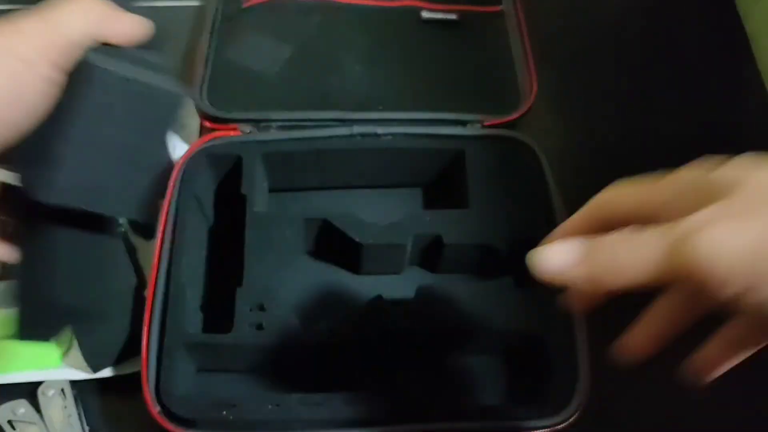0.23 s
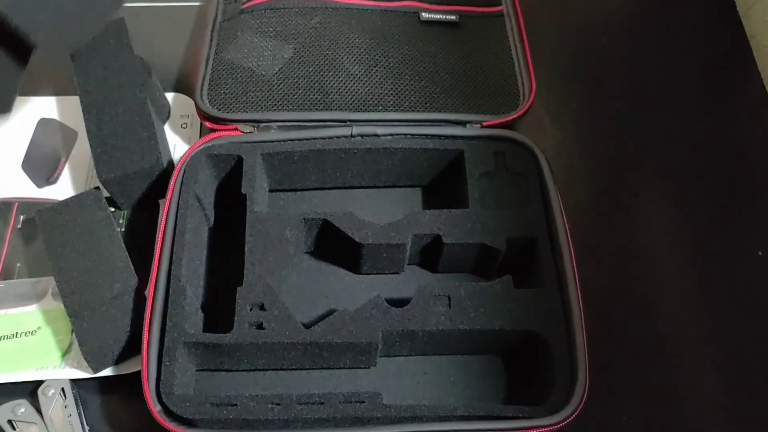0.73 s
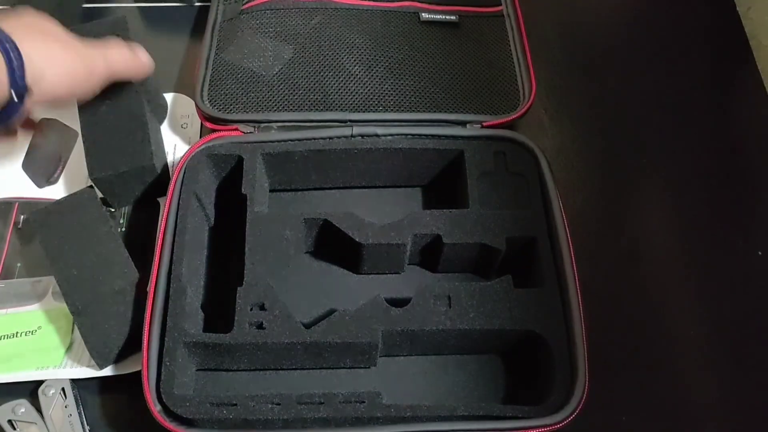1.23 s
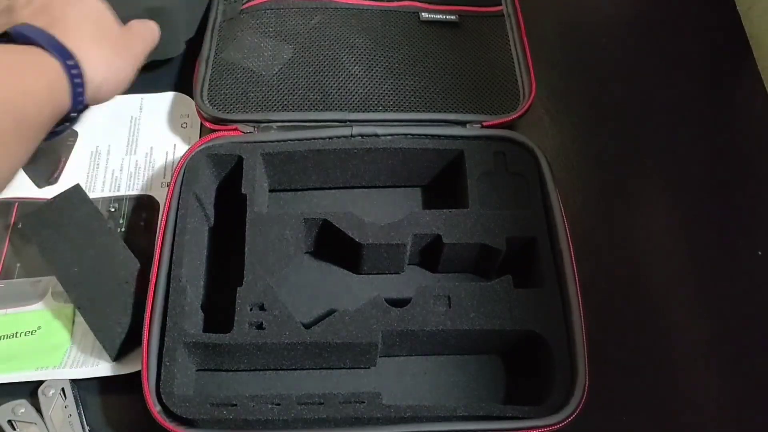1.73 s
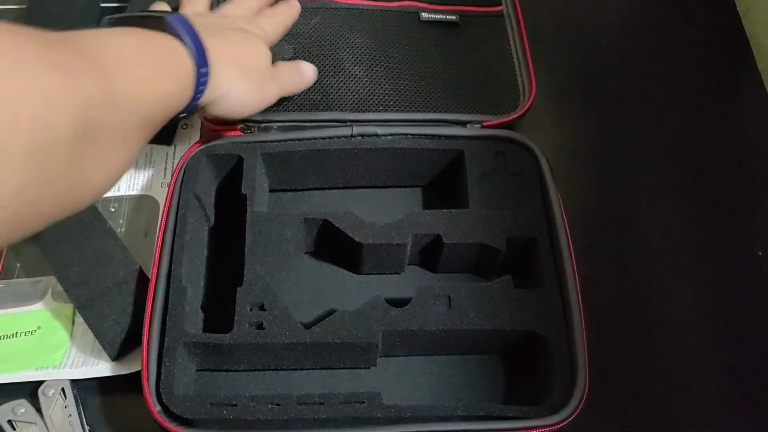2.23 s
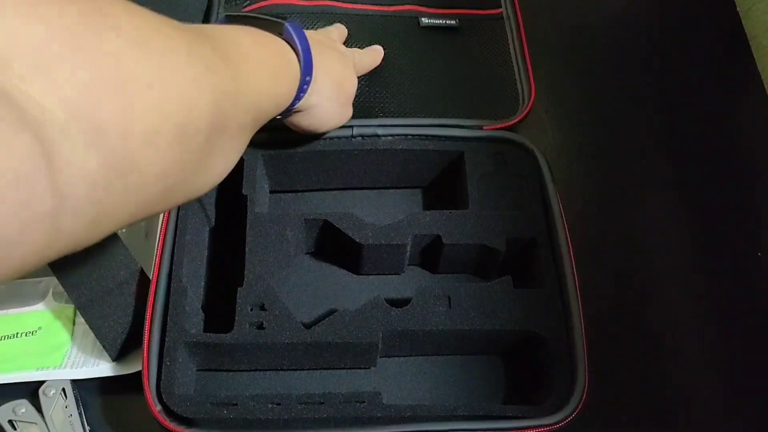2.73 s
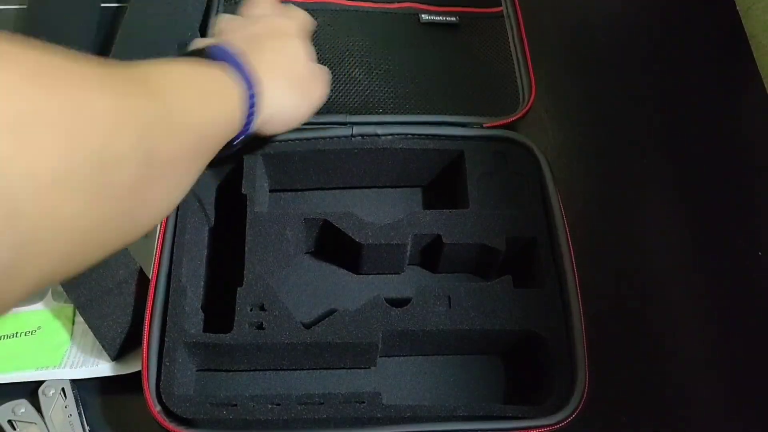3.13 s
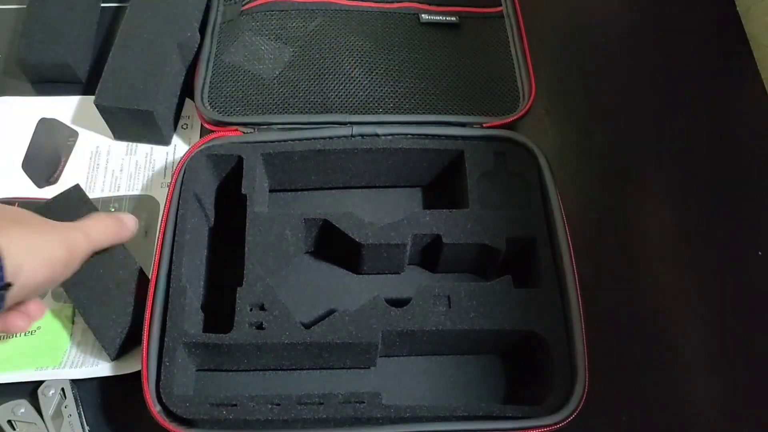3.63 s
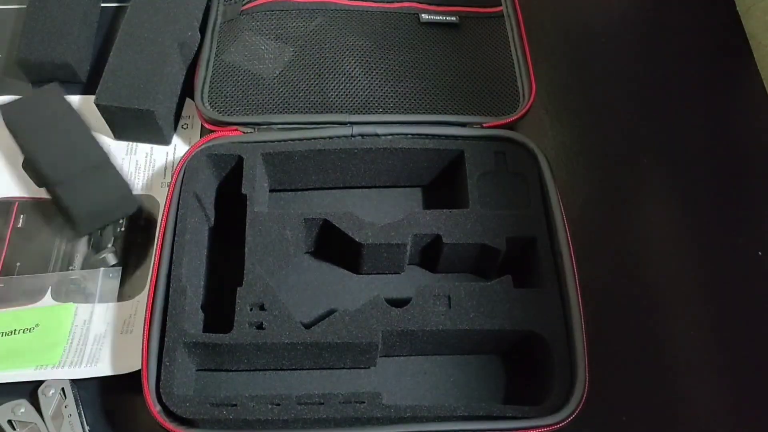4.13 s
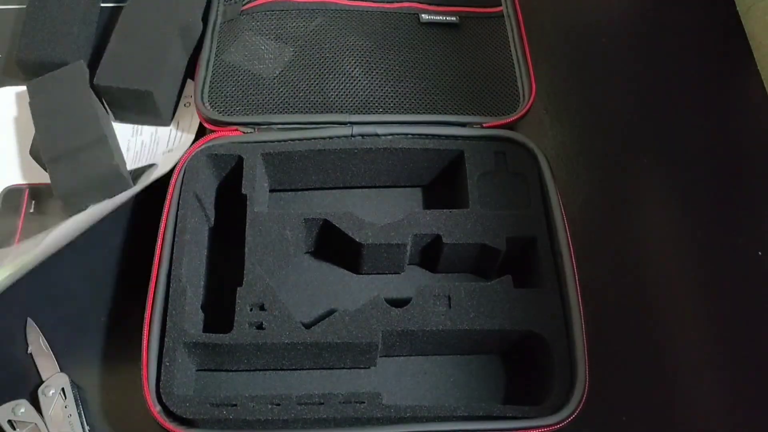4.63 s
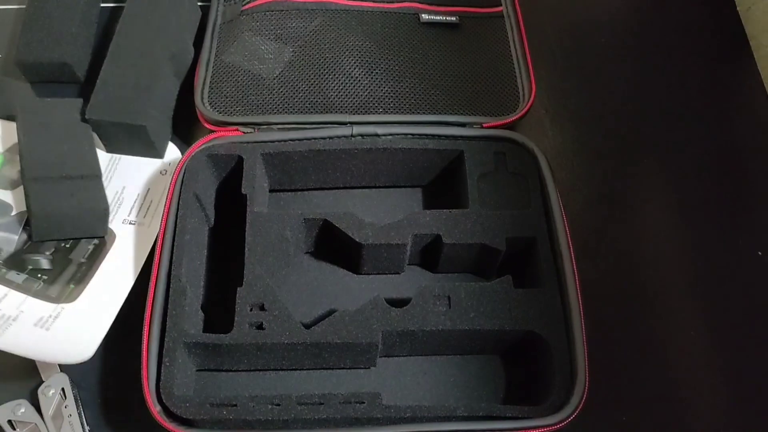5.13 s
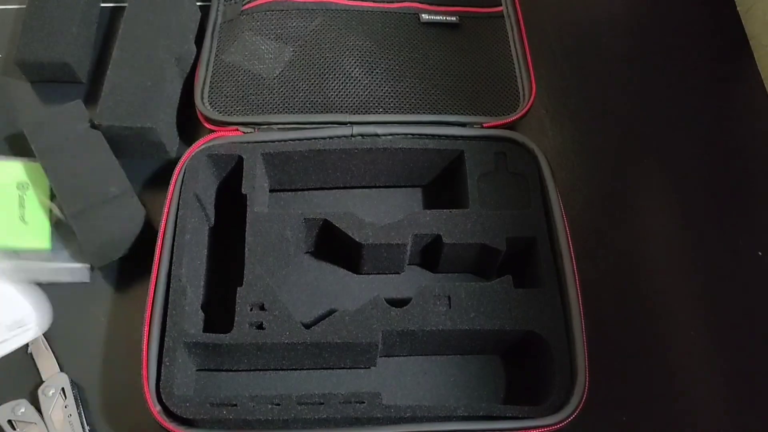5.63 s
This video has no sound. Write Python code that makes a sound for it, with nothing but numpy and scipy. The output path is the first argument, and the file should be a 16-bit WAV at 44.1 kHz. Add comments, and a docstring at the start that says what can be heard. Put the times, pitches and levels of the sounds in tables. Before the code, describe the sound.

A smooth low hum runs throughout in a small quiet room, with one microphone close to a table. A faint hissy rub of stiff foam on paper comes first. At about 0.8 seconds foam blocks land with soft knocks, each bouncing once and ringing the hollow tabletop. A louder cluster follows from 1.2 to 1.4 seconds, mixed with rasps and tiny snaps. A short slide comes at 2 seconds, a firm knock at 2.2, light rubs around 2.5 and 3, and another knock at 3.3. After a lull, a gentle bump sounds at 4.4 seconds. From 4.6 until nearly 6 seconds, foam and paper slide in a grainy, scraping rub with small snaps and a few weak bumps at its start. Faint, brief fuzzy tones flicker over the hum behind the handling.

```python
"""A smooth low hum and a faint rub of foam on paper come first, on one microphone.
Close by, in a small quiet room, stiff foam blocks are set down and slid on papers beside an open hard case.
Each landing is a soft blow that bounces once and rings the hollow table; tiny slips of the foam cells
make rubs and snaps. Behind them, faint narrow tones flicker over the hum."""
import sys
import numpy as np
from scipy import signal
from scipy.fft import rfft, irfft
from scipy.io import wavfile
from scipy.ndimage import uniform_filter1d, minimum_filter1d

SR = 44100
rng = np.random.default_rng(int(sys.argv[2]) if len(sys.argv) > 2 else 0)


def master(y):
    """Save y as 16-bit WAV."""
    cut = np.clip(np.atleast_2d(y).T, -1, 1)
    pcm = np.round(cut * 32767)  # scale
    wavfile.write(sys.argv[1], SR, pcm.astype(np.int16))


N = 259456

# spectrum of the background hum: (frequency [Hz], relative density [dB])
HUM_SPECTRUM = [(12, -35.5), (20, 1), (304, 3.5), (490, -4), (630, 0.5), (1040, -6.5), (1730, -9.5),
                (1860, -10), (2220, -14.5), (6550, -30), (8220, -34), (10700, -66), (18100, -120)]
# the clearest narrow tones: (start [s], frequency [Hz], level [dB], length [s])
FLICKER_TONES = [(0.682, 1744, -57, 0.039), (1.56, 5960, -64, 0.2), (1.688, 1820, -58, .11),
                 (2.015, 1357, -40, 0.057), (2.527, 3124, -57.5, 0.14), (2.554, 620, -54, 0.052),
                 (2.941, 1870, -61, 0.07), (3.056, 1700, -61.5, 0.14), (3.167, 642, -56, 0.25),
                 (3.543, 1873, -58.5, 0.29), (3.402, 1675, -65.5, .14), (3.776, 1462, -62.5, 0.19),
                 (3.886, 1838, -61.5, 0.088), (4.065, 1877, -65.5, 0.16), (4.733, 1640, -39.5, 0.038),
                 (5.21, 2500, -51, 0.058), (5.215, 1605, -54.5, 0.082), (5.327, 1515, -43.5, 0.029),
                 (5.659, 2180, -56, .075)]
# reverberation of the small room: (frequency [Hz], t60 [s])
ROOM_DECAY = [(100, 0.46), (300, 0.27), (700, 0.32), (2000, 0.29), (5000, 0.25), (8000, 0.16)]
# spectra of the foam's hiss and rasp: (frequency [Hz], relative density [dB])
HISS_SPECTRUM = [(2350, -49), (4000, -7.5), (4460, -11), (4920, 1.5), (5290, 2.5), (6600, 9.5),
                 (7790, -1.5), (8350, -27.5), (10700, -56.5), (18100, -120)]
RASP_SPECTRUM = [(1800, -53), (2500, 16.5), (3500, 9), (4600, 11), (5500, -37)]
# boxy resonances of foam on paper: (frequency [Hz], nominal width [Hz], relative level [dB])
BODY_MODES = [(1404, 83, 4.5), (1623, 180, 7), (1860, 150, -2), (2242, 190, -2), (1264, 120, -3)]
# slides across the paper: (start [s], rise [s], hold [s], hiss level [dB], change over the hold [dB],
# rasp re hiss [dB], body re hiss [dB], rasp centre [Hz])
RUB_STROKES = [(-.02, .02, 0.13, -67, -9.5, -30, -20, 2530), (0.301, .17, 0.18, -51.5, 2, -17, -19, 3900),
               (1.184, 0.033, 0.042, -42, -1.5, 2, 1.5, 3200),
               (1.48, 0.017, 0.016, -62.5, -6.5, -7.5, 4, 2840),
               (1.562, 0.12, .14, -69, -11, -28.5, 5.5, 2600),
               (1.784, 0.11, .11, -60.5, -4.5, -7.5, -0.5, 3400),
               (1.975, 0.07, 0.15, -46, -23.5, 0.5, 3.5, 3450),
               (2.524, 0.031, 0.18, -48, -8.5, -11.5, -13.5, 3100),
               (2.94, .025, 0.087, -59.5, 1.5, -15, -25, 3400),
               (3.06, .035, 0.034, -50.5, -11.5, -17, -5, 2450),
               (3.5, 0.029, 0.083, -71.5, -4.5, -25, -25, 3000),
               (4.614, 0.021, .23, -44.5, -10.5, -2, -7, 3720), (4.841, .04, .07, -56, -3, -19, -3.5, 3846),
               (4.712, 0.063, 0.061, -53, -3.5, -14, 11, 3670),
               (4.957, .025, .03, -58.5, -0.5, 3, -2, 2500), (5.005, .02, 0.08, -44, -5.5, 1.5, 12.5, 2750),
               (5.1, 0.032, .32, -49.5, -0.5, -2, -4.5, 2950), (5.455, .06, 0.16, -48, -2, -5, -10.5, 3900),
               (5.687, .03, 0.3, -56, -11.5, -18.5, -22.5, 2600),
               (5.806, 0.097, .05, -49, -6, -3, 1.5, 2745)]
# snaps of foam and paper: (time [s], hiss level [dB], rasp re hiss [dB], body re hiss [dB], length [s])
FOAM_SNAPS = [(0.79, -60.5, 13, 15.5, .016), (0.903, -33, 1, 8, 0.0079), (1.032, -45.5, 8.5, 16, 0.0058),
              (1.218, -38, -0.5, 5.5, 0.029), (1.302, -44, -12, 9, 0.011), (1.374, -32.5, 10, 19.5, 0.0041),
              (1.395, -42.5, -22.5, -2.5, 0.0087), (2.225, -38, 3, 0.5, 0.0091),
              (2.528, -48, -1, -8, 0.012), (2.808, -54.5, -8.5, -1, 0.012),
              (2.954, -51.5, -4.5, -9.5, 0.012), (3.065, -43, -28.5, -29, 0.0059),
              (4.611, -54.5, 5.5, -10, .01), (4.753, -36.5, -2.5, 3.5, 0.016), (4.977, -39.5, 1.5, -8, .01),
              (5.015, -36.5, 1.5, 4, 0.019), (5.124, -47, 15, 10.5, 0.0053),
              (5.417, -35, -9.5, -29, 0.0076), (5.856, -49, 6, 9, 0.016)]
# modes of the hollow table top: (frequency [Hz], relative level [dB], t60 [s])
TABLE_MODES = [(78.8, -11.5, 0.23), (97, -8.5, 0.44), (150, -33.5, .3), (226.8, -1.5, .25), (237, -24, .2),
               (307.2, -1, 0.22), (360.4, 4, 0.16), (409.5, -3, 0.21), (480, 5.5, 0.034),
               (516, -19.5, 0.083), (642, -11.5, 0.1), (742.6, -14.5, 0.16), (723, -22.5, 0.063),
               (790, -18, .2), (876, -22, 0.12)]
# blocks landing on the table: (time [s], level [dB], pitch [Hz], contact [cycles],
# hard edge re blow [dB], bounce re blow [dB])
BLOWS = [(0.202, -45, 334, 4.5, -21.5, -9), (.784, -11.5, 211, 2.17, -31, -19.5),
         (.792, -6.5, 302, 2.38, -11.5, -5.5), (0.877, -11, 416, 2.78, -16.5, -16.5),
         (1.185, -14, 418, 3.05, -18, -24), (1.21, -15, 349, 4.5, -17, 6),
         (1.241, 2.5, 408, 2.1, -15.5, -20), (1.249, -11, 298.5, 6, -25, -8.5),
         (1.374, 4, 427, 2.38, -10.5, -28.5), (1.38, -3.5, 408.6, 2.06, -11.5, -6),
         (1.415, -25, 330, 2.3, 10, -1), (1.495, -19.5, 250, 1.92, -10, -11),
         (1.823, -38.5, 295, 3.8, -14, -15.5), (1.993, -27.5, 401, 4.5, -28, -1.5),
         (2.049, -35.5, 296.6, 3.5, -25.5, -22.5), (2.228, -1, 372.5, 2.77, -10.5, -10),
         (3.302, -7.5, 391, 2.83, -14, -9), (4.33, -43, 190, 3.1, -24, -5.5),
         (4.412, -23.5, 329, 3.34, -35, 7), (4.705, -31.5, 369.5, 4.4, 5.5, -3),
         (4.74, -36.5, 360, 5.7, -16.5, -6.5), (4.772, -29, 396.5, 4.4, -11, -16)]

HUM_DB = -60
FAINT_FROM_S, FAINT_TO_S, FAINT_COUNT = 1.5, 4.5, 24  # fainter tones, one by chance in each equal slot
FAINT_HZ, FAINT_SPREAD_HZ, FAINT_DB, FAINT_S = 1700, 400, -61.5, 0.063
SWELL_DB, RELEASE_DB_PER_S = 23, 298.5  # a stroke swells by this much and dies when the hand lets go
SNAP_RISE_S = 0.006
BOUNCE_S, BOUNCE_PITCH_RATIO = .015, 0.869  # the bounce lands a little later and flatter
LIMITER_CEILING, MIC_TOP_HZ = .76, 8370


def amp(db):
    """Decibels to gain."""
    return 10 ** (np.asarray(db) / 20)


def unit_rms(x):
    """Scales to rms 1."""
    return x / np.sqrt(np.mean(x ** 2) + 1e-20)


def value_at(points, hz):
    """Reads a table on a log frequency axis."""
    table_hz, value = np.transpose(points)
    return np.interp(np.log(hz + 1), np.log(table_hz + 1), value)


def add(mix, start_s, sound):
    """Mixes a sound in at a time."""
    part = mix[max(round(start_s * SR), 0):][:len(sound)]
    part += sound[:len(part)]


def band(x, lo_hz, hi_hz):
    """Band-pass."""
    return signal.sosfilt(signal.butter(2, [lo_hz, hi_hz], "bandpass", fs=SR, output="sos"), x)


def coloured(x, spectrum):
    """Gives a long noise a spectrum, rms 1."""
    gain = amp(value_at(spectrum, np.fft.rfftfreq(len(x), 1 / SR)))
    return unit_rms(irfft(rfft(x) * gain, len(x)))


def resonate(x, hz, width_hz):
    """One resonance of gain 1 that follows the curve hz."""
    carrier = np.exp(2j * np.pi * np.cumsum(hz * np.ones(len(x))) / SR)
    pole = np.exp(-np.pi * width_hz / SR)
    return 2 * (carrier * signal.lfilter([1 - pole], [1, -pole], x / carrier)).real


def drift(rate_hz):
    """A slow random wander, rms 1."""
    pole = np.exp(-6 * rate_hz / SR)
    return unit_rms(signal.lfilter([1], [1, -2 * pole, pole ** 2], rng.standard_normal(N)))


def patchy(x, depth_db, bins, frames):
    """Lifts and lowers random patches of time and frequency, rms 1."""
    spectra = signal.stft(x, nperseg=512, noverlap=384)[2]
    patches = rng.standard_normal(spectra.shape)
    for _ in range(2):
        patches = uniform_filter1d(uniform_filter1d(patches, size=bins, axis=0), size=frames, axis=1)
    spectra *= amp(depth_db * unit_rms(patches))
    return unit_rms(signal.istft(spectra, nperseg=512, noverlap=384)[1][:N])


def background_hum():
    """A steady, smooth, low background hum."""
    hum = coloured(rng.standard_normal(N), HUM_SPECTRUM)
    return amp(HUM_DB) * patchy(hum, depth_db=1, bins=3, frames=12)


def flickers():
    """Narrow bands of noise fade in and out over the hum as brief fuzzy tones."""
    noise, tones = rng.standard_normal(N + SR), np.zeros(N)
    slot_s = (FAINT_TO_S - FAINT_FROM_S) / FAINT_COUNT
    faint = [(FAINT_FROM_S + (k + delay) * slot_s, FAINT_HZ + FAINT_SPREAD_HZ * (pitch - .5),
              FAINT_DB + 5 * (level - .5), FAINT_S * (.5 + stretch))
             for k, (delay, pitch, level, stretch) in enumerate(rng.random((FAINT_COUNT, 4)))]
    settle = 2000  # samples for the resonances to build up
    for start, hz, db, length in FLICKER_TONES + faint:
        drive = noise[round(start * SR):][:round(length * SR) + settle]
        fuzzy = resonate(resonate(drive, hz, width_hz=47), hz, width_hz=110)[settle:]
        add(tones, start, amp(db) * unit_rms(fuzzy) * signal.windows.tukey(len(fuzzy), .6))
    return tones


def room_echoes(x):
    """The near walls return sparse echoes of random sign, each band dying at its own speed."""
    taps = np.zeros(SR // 2)
    slots = np.arange(150, len(taps) - 20, 20)
    taps[slots + rng.integers(0, 20, len(slots))] = rng.choice([-1., 1.], len(slots))
    hz, t, spectra = signal.stft(taps, SR, nperseg=256)
    decay = amp(-60 * t / value_at(ROOM_DECAY, hz)[:, None])
    tail = signal.istft(spectra * decay, SR, nperseg=256)[1]
    return signal.oaconvolve(x, tail / np.linalg.norm(tail))[:N]


def foam_colours(slips, centre_hz, focus_db, drift_db):
    """Slips sound in three rows: as hiss, as a rasp with a moving focus and as a boxy body."""
    rasp = coloured(slips, RASP_SPECTRUM)
    rasp += amp(focus_db) * unit_rms(resonate(rasp, centre_hz, width_hz=300))
    body = np.zeros(N)
    for hz, width, db in BODY_MODES:
        mode = resonate(resonate(slips, hz, 1.5 * width), hz, 1.5 * width)
        body += amp(db + drift_db * drift(39)) * mode
    return np.array([coloured(slips, HISS_SPECTRUM), unit_rms(rasp), unit_rms(band(body, 1000, 3100))])


def stroke_db(t, start, rise, hold, db, change_db):
    """Swell, sloping hold and release of one stroke, in dB."""
    end = start + rise + hold
    shape = np.interp(t, [start, start + rise, end], [-SWELL_DB, 0, change_db])
    return db + shape - RELEASE_DB_PER_S * np.maximum(t - end, 0) - 4000 * np.maximum(start - t, 0)


def hand_strokes():
    """Strokes add in power: gives the hiss, rasp and body envelopes and the rasp's centre in Hz."""
    t = np.arange(N) / SR
    power, weighted_hz = np.zeros((3, N)), np.zeros(N)
    for *shape, rasp_db, body_db, centre_hz in RUB_STROKES:
        stroke_power = np.outer(amp([0, rasp_db, body_db]), amp(stroke_db(t, *shape))) ** 2
        power += stroke_power
        weighted_hz += centre_hz * stroke_power[1]
    return np.sqrt(power), (weighted_hz + 3000 * 1e-30) / (power[1] + 1e-30)  # rests at 3000 Hz


def foam_rubs(envelopes, centre_hz):
    """A sliding block makes a dense, grainy rub whose colour flickers in random patches."""
    slip_db = 1.5 * rng.exponential(1, N) + 1.38 * drift(40)
    slips = amp(slip_db) * rng.standard_normal(N)
    slips *= rng.random(N) < 14000 / SR  # about 14000 slips a second
    slips = patchy(slips, depth_db=4.5, bins=2, frames=12)
    return (foam_colours(slips, centre_hz, focus_db=0, drift_db=3) * envelopes).sum(0)


def foam_snaps(centre_hz):
    """Slips of foam and paper bunch into short puffs of noise with a quick rise."""
    envelopes, t = np.zeros((3, N)), np.arange(6000) / SR
    for start, db, rasp_db, body_db, length in FOAM_SNAPS:
        puff = np.minimum(t / SNAP_RISE_S, 1) * np.exp(-(t / length) ** 2.4)
        for envelope, share_db in zip(envelopes, (0, rasp_db, body_db)):
            add(envelope, start, amp(db + share_db) * puff)
    colours = foam_colours(rng.standard_normal(N), centre_hz, focus_db=-8, drift_db=.8)
    return (colours * envelopes).sum(0)


def table_blows():
    """Each blow, a soft push with a harder edge, reaches the microphone direct and rings the table."""
    push, edge, weight = np.zeros((3, N))
    bounces = [(start + BOUNCE_S, db + bounce_db, hz * BOUNCE_PITCH_RATIO, cycles, edge_db, 0)
               for start, db, hz, cycles, edge_db, bounce_db in BLOWS]
    for start, db, hz, cycles, edge_db, _ in BLOWS + bounces:
        progress = np.arange(0, 1, hz / cycles / SR)
        phase = 2 * np.pi * cycles * (progress - .5)
        contact = -amp(db) * np.sin(np.pi * progress) ** 2
        add(push, start, contact * np.cos(phase))
        add(edge, start, amp(edge_db) * contact * np.cos(1.94 * phase))
        add(weight, start, contact)  # the block's weight bends the top and sounds its lowest modes
    t = np.arange(SR // 2) / SR
    modes = sum(amp(db - 60 * t / t60) * np.sin(2 * np.pi * hz * t) for hz, db, t60 in TABLE_MODES)
    force = push + amp(9) * edge + amp(-15.5) * weight
    ring = amp(-54) * signal.oaconvolve(force, modes)[:N]
    heard = band(amp(-2) * push + amp(-4) * edge + ring, 65, 1400)
    return band(heard, 70, 4000)  # a small block moves little air in the deep bass


def scene():
    """Blows, rubs and snaps close to the microphone, their weaker echoes, and the hum under all."""
    envelopes, centre_hz = hand_strokes()
    rubs = foam_rubs(envelopes, centre_hz)
    snaps = foam_snaps(centre_hz)
    blows = table_blows()
    echoes = room_echoes(amp(-11) * blows + amp(-3) * snaps + amp(-13.5) * rubs)
    return (background_hum() + flickers() + echoes + rubs + snaps + blows)[None]


def low_pass(x, hz):
    """A steep treble cut with no delay."""
    return signal.oaconvolve(x, signal.firwin(301, hz, window=("kaiser", 9), fs=SR)[None], "same")


def record(dry):
    """A quick limiter turns the hardest blows down; then the microphone's band limit and converter hiss."""
    gain = np.minimum(LIMITER_CEILING / (abs(dry) + 1e-9), 1)
    gain = uniform_filter1d(minimum_filter1d(gain, size=265, axis=1), size=265, axis=1)  # 6 ms windows
    picked_up = low_pass(dry * gain, MIC_TOP_HZ)
    hiss = amp(-88) * rng.standard_normal(dry.shape)
    return low_pass(picked_up + hiss, hz=15500)


dry = scene()
out = record(dry)
master(out)
```